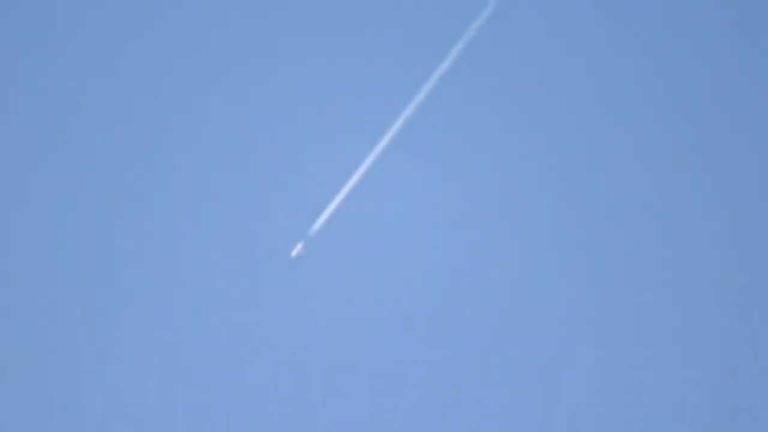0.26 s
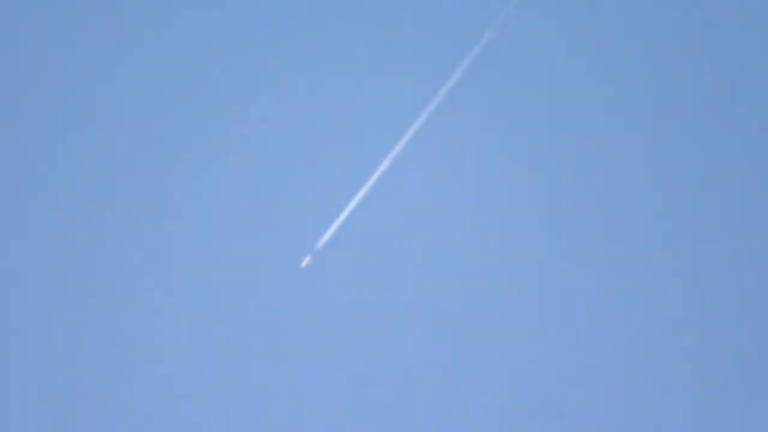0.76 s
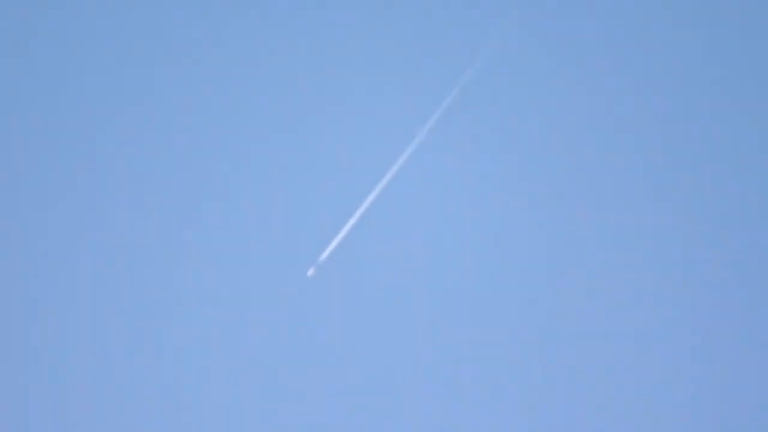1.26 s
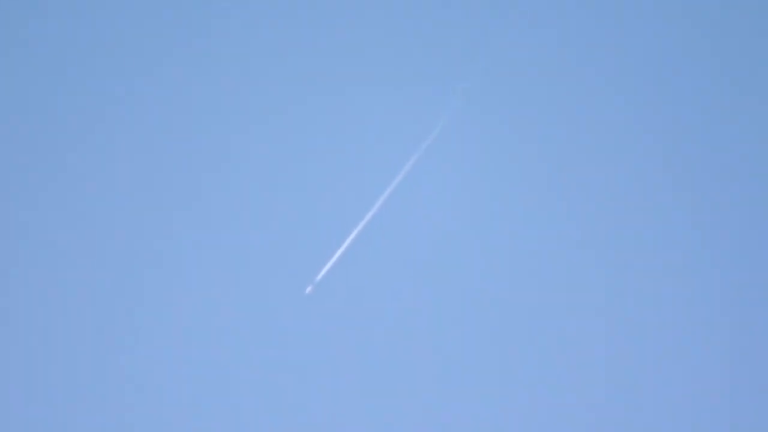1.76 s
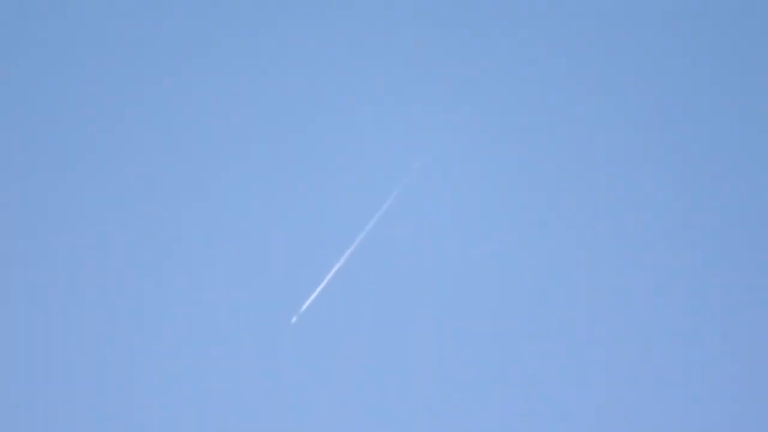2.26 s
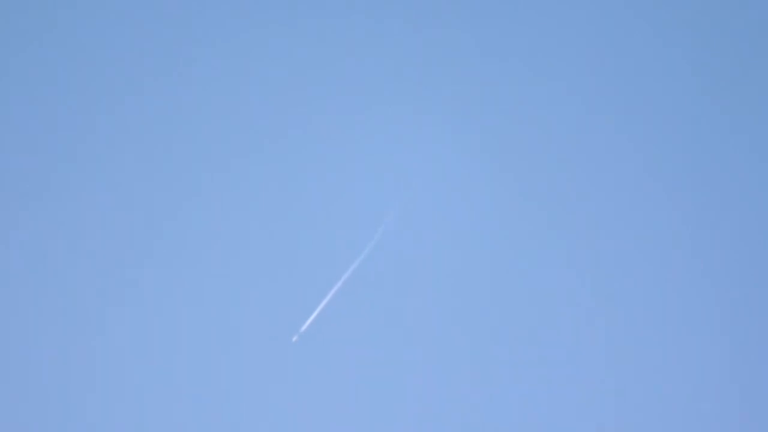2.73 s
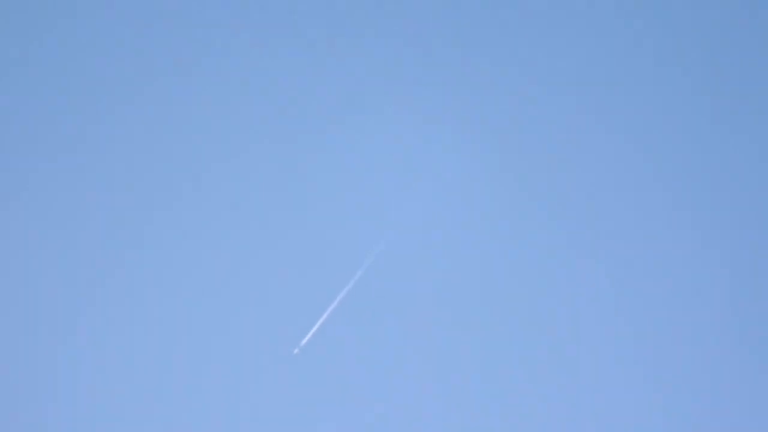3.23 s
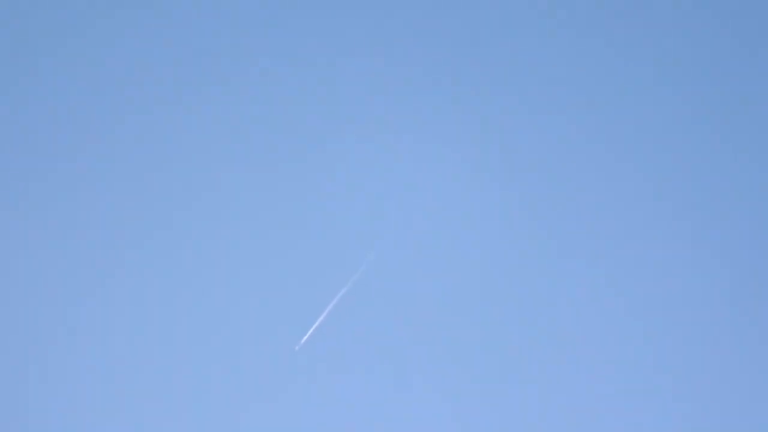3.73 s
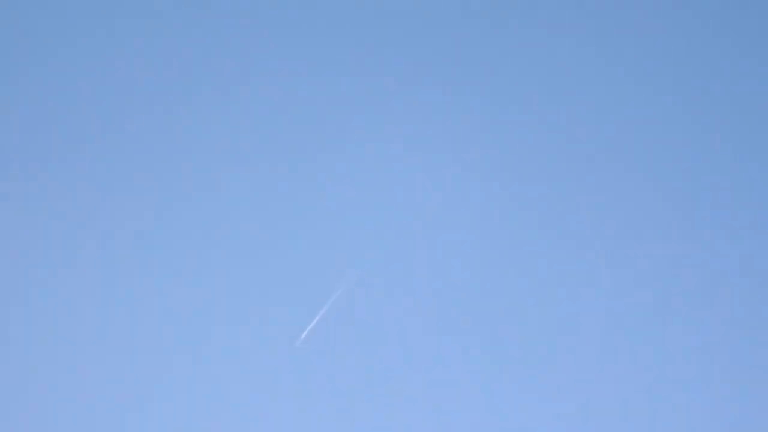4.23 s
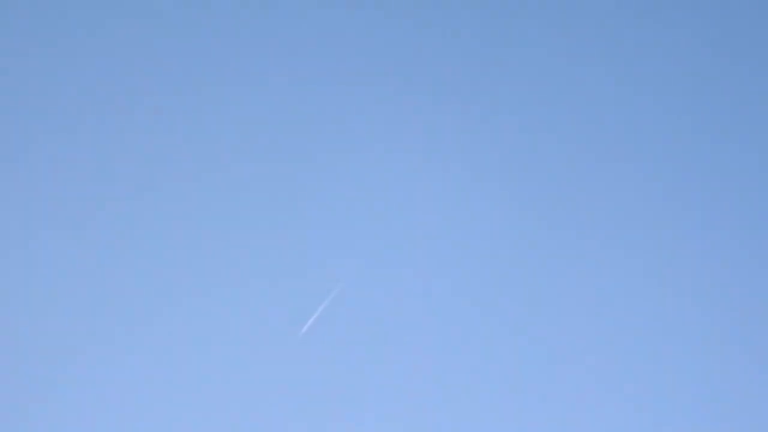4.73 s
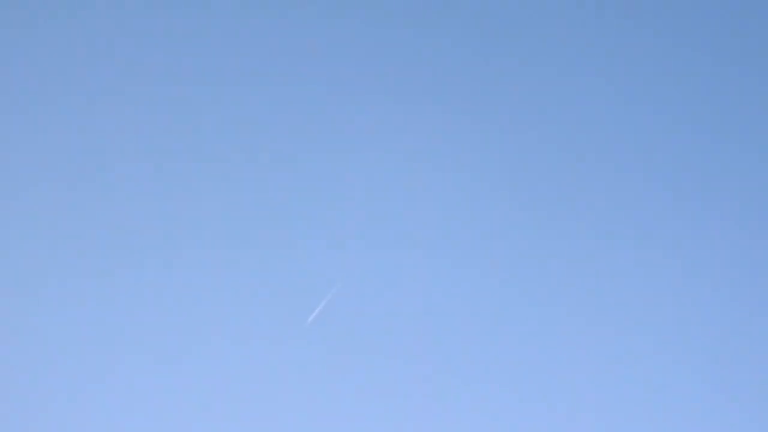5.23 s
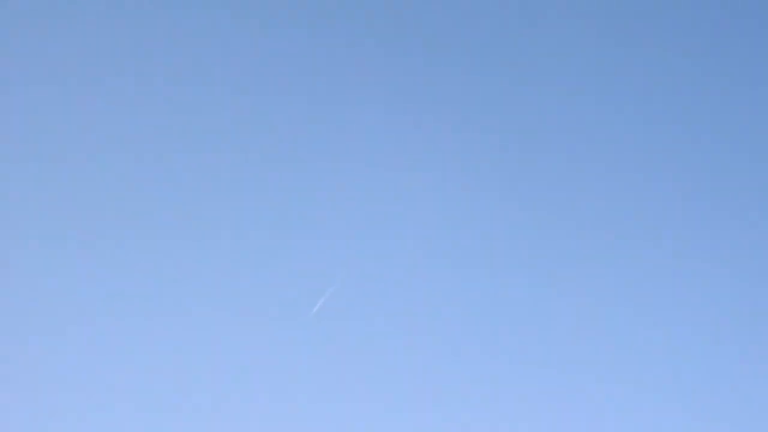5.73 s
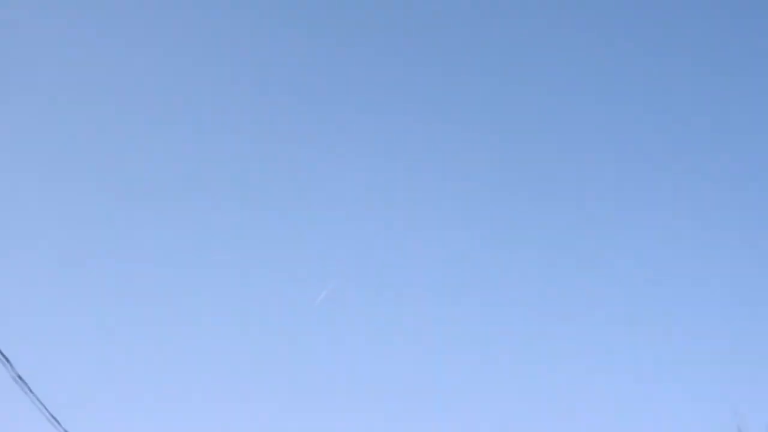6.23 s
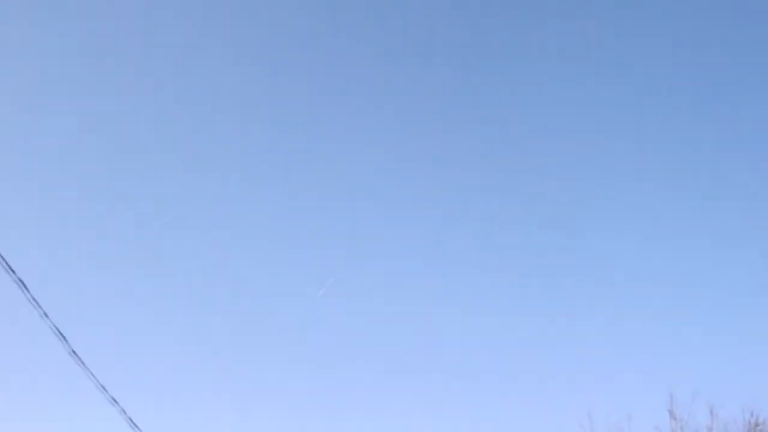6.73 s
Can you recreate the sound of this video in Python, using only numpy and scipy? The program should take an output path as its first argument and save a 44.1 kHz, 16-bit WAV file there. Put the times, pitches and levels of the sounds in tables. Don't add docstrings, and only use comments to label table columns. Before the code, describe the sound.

A very close, continuous gritty buzz from a small lens motor rings a plastic case, fluttering slightly in speed and never smooth. It begins fuller, drops a few decibels near three seconds while small metallic ticks chatter irregularly, then gradually strengthens. Soft wind, far traffic rumble and electronic hiss stay behind. A cluster of loud dry creaks at the end marks the fingers moving as the motor stops.

```python
import sys
import numpy as np
from scipy import signal
from scipy.fft import rfft, irfft, next_fast_len
from scipy.io import wavfile
from scipy.ndimage import uniform_filter1d

SR = 44100
rng = np.random.default_rng(int(sys.argv[2]) if len(sys.argv) > 2 else 0)


def ratio_of_db(decibels):
    return 10 ** (np.asarray(decibels, float) / 20)


def wrap_up_sound(samples):
    columns = np.atleast_2d(samples).T
    tamed = np.clip(columns, -1, 1)
    steps = np.round(tamed * 32767).astype(np.int16)
    wavfile.write(sys.argv[1], SR, steps)


N = 307641

MOTOR = [(0, 188, -41), (.5, 192, -42.5), (1.3, 190, -42.5), (1.6, 194, -42.5), (1.85, 190, -41.5),
         (2.201, 188, -41), (2.6, 191, -42), (2.95, 189, -46), (3.499, 187, -46.5), (3.85, 190, -46.5),
         (4.15, 185, -46.5), (4.45, 189, -45.5), (4.7, 195, -45.5), (5.1, 197, -44.5), (5.351, 190, -44.5),
         (5.799, 193, -43.5), (6.5, 191, -43.5), (6.903, 184, -42.5)]


def level(x, db):
    return x * ratio_of_db(db) / np.sqrt(np.mean(x ** 2))


def band(x, hz, width):
    return signal.lfilter(*signal.iirpeak(hz, hz / max(width, 10.), fs=SR), x)


def ring(x, modes):
    return level(sum(np.sign(side) * ratio_of_db(db) * band(x, hz, width) for hz, width, db, side in modes), 0)


def coloured(points):
    hz, db = np.transpose(points)
    size = next_fast_len(N)
    freq = np.arange(size // 2 + 1) * SR / size
    gain = ratio_of_db(np.interp(np.log(np.maximum(freq, .1)), np.log(hz), db))
    return irfft(rfft(rng.standard_normal(size)) * gain, size)[:N]


def walk(rate):
    k = int(SR / rate)
    steps = np.repeat(rng.standard_normal(N // k + 1), k)
    w = uniform_filter1d(uniform_filter1d(steps, k), k)[:N]
    return w / w.std()


def add(out, s, sound):
    i = int(s * SR)
    out[i:i + len(sound)] += sound[:len(out) - i]


def scraping(knocks, ms):
    return signal.lfilter([1], [1, -np.exp(-1000 / ms / SR)], np.abs(knocks)) * rng.standard_normal(N)


def motor_jolts(t):
    when, hz, _ = np.transpose(MOTOR)
    hunt_jolts, hunt_keep = 11.5, .82
    depth = np.maximum(.078 - .0065 * (hz - 190), .02)
    speed = np.interp(t, when, hz) * (1 + .17 * np.interp(t, when, depth) * walk(5))
    turns = np.cumsum(speed) / SR
    jolt = np.arange(int(np.interp(when[-1], t, turns)))
    chance = rng.standard_normal((2000, 3))[jolt].T

    spring = [1, -2 * hunt_keep * np.cos(2 * np.pi / hunt_jolts), hunt_keep ** 2]
    hunt = signal.lfilter([1, -.7], spring, chance[0])
    slip = .9 * hunt / hunt.std() * np.interp(np.interp(jolt, turns, t), when, depth)
    lag = signal.lfilter([1], [1, -.9], slip) + .016 * chance[2]
    at = (np.interp(jolt + lag, turns, t) * SR).astype(int)

    sign = (-1.) ** jolt
    turn_db = 1.0 * np.cos(np.pi * jolt / 3) + 1.3 * sign + 17 * slip
    touch_db = 1.0 * chance[1] - .3 * chance[1] ** 2
    coil_db = .9 * np.cos(2 * np.pi * jolt / 3) + .5 * np.cos(np.pi * jolt / 3) - .9 * sign
    knocks, to_metal, to_shell = np.zeros((3, N))
    knocks[at] = sign * ratio_of_db(turn_db + touch_db)
    to_metal[at] = ratio_of_db(2.0 * sign) * knocks[at]
    to_shell[at] = ratio_of_db(coil_db) * knocks[at]
    return knocks, to_metal, to_shell


def gears():
    # f/Hz, width/Hz, level/dB, polarity (like neighbours leave a dark notch between)
    barrel_modes = [(759, 140, -12.4, -1), (938, 81, -2, 1), (1018, 400, -10.9, -1), (1157, 105, -1, -1),
                    (1310, 153, -2.6, 1), (1423, 86, -2.3, 1), (1652, 53, -9.3, -1), (1691, 42, -7.8, -1)]
    shell_modes = [(1873, 216, -7, -1), (2036, 110, -12.4, -1), (2428, 100, -.3, 1), (2678, 118, -5.3, 1),
                   (2856, 116, -7.2, 1), (3017, 71, -16.2, 1), (3194, 193, -11.4, -1),
                   (3434, 328, -14.5, -1)]
    bracket_modes = [(4020, 260, 11, 1), (4446, 310, 10.5, -1), (5330, 360, 0, -1), (6180, 800, -6, 1)]
    can_modes = [(7480, 350, 0, 1)]

    t = np.arange(N) / SR
    when, _, load_db = np.transpose(MOTOR)
    barrel_db = np.interp(t, when, load_db)
    extra_db = barrel_db + 44.5
    shell_db = -44 + 0.75 * extra_db
    bracket_db = -57 + 0.21 * extra_db
    can_peak_s = 1.6
    can_db = -63.5 - np.maximum(1.7 * (can_peak_s - t), 2 * (t - can_peak_s))

    knocks, to_metal, to_shell = motor_jolts(t)
    no_middle = signal.butter(2, [1050, 2650], "bandstop", fs=SR, output="sos")
    scrape = signal.sosfilt(no_middle, level(scraping(knocks, ms=1.5), 0))
    push = level(knocks, 0) + ratio_of_db(-8) * scrape + level(scraping(knocks, ms=10), -12)
    fine = level(to_metal, -1.5) + level(scraping(to_metal, ms=3.4), 0)
    fine = fine + level(scraping(to_metal, ms=4.9), -0.5)
    shell_push = level(to_shell, 0) + ratio_of_db(-8) * scrape + level(scraping(to_shell, ms=14), -8.5)
    shell = ring(shell_push, shell_modes)

    rest, full = -0.53, 0.38
    slide = rest + (full - rest) * np.exp(-((t - 3.2) / 1.73) ** 2)
    shell = shell + slide * (band(shell, 3070, 360) - 0.92 * band(shell, 2860, 130))

    case = ratio_of_db(barrel_db) * ring(push, barrel_modes) + ratio_of_db(shell_db) * shell
    return case + ratio_of_db(bracket_db) * ring(fine, bracket_modes) + ratio_of_db(can_db) * ring(fine, can_modes)


def outdoors():
    # f/Hz, level/dB
    wind_colour = [(1.8, -32), (3.0, 5.5), (22, 2.5), (67, -13.5), (100, -27), (130, -75), (220, -120)]
    town_colour = [(40, -2.5), (70, 2.5), (95, -3.5), (150, -2), (200, 0.5), (270, -4.5), (310, -12),
                   (520, -19), (1000, -23), (3000, -17), (4200, -31.5), (5000, -30.5), (9000, -72)]
    # t/s, level/dB
    breeze = [
        (0, -36),
        (1.6, -35),
        (3.0, -36),
        (4.5, -39.5),
        (5.6, -39.5),
        (6.3, -37),
        (6.98, -39.5),
    ]
    s, db = np.transpose(breeze)
    gust_db, gusts_per_s = 3, 3.42
    wind = level(coloured(wind_colour), 0)
    wind = wind * ratio_of_db(np.interp(np.arange(N) / SR, s, db) + gust_db * walk(gusts_per_s))
    return wind + level(coloured(town_colour), -43) * ratio_of_db(0.6 * walk(2.3))


def electronics():
    # f/Hz, level/dB
    hiss_colour = [(200, 15.5), (6000, -7), (9000, -5), (12500, -4), (16000, -8.5)]
    # f/Hz, level/dB
    whistle_tones = [(15547, -92), (15606, -100)]
    frame_hz = 29.503
    burst_start, burst_share, blip_at = .12, .065, .565

    t = np.arange(N) / SR
    frame = t * frame_hz % 1
    same = rng.standard_normal(1500)[(frame * SR / frame_hz).astype(int)]
    in_burst = np.abs(frame - burst_start - burst_share / 2) < burst_share / 2
    crackle = in_burst * (0.41 * same + rng.standard_normal(N))
    blip = (np.abs(frame - blip_at) < .008) * same
    buzz = level(band(crackle, 13000, 9000), -70.0) + level(band(blip, 7600, 2000), -88)
    whistle = sum(ratio_of_db(db) * np.sin(2 * np.pi * hz * t) for hz, db in whistle_tones)
    return level(coloured(hiss_colour), -55.5) + buzz + whistle


def focus_drive():
    # f/Hz, width/Hz, level/dB
    spots = [(950, 260, -62), (4150, 300, -60.5)]
    out = np.zeros(N)
    for hz, width, db in spots:
        hum = band(band(rng.standard_normal(N), hz, width), hz, 1.6 * width)
        out += level(hum, db)
    return out


def rattles():
    # t/s, level/dB (the peak lies 8 dB lower)
    hard = [(0.168, -48), (2.0178, -42), (2.8796, -33), (2.9148, -38), (3.0081, -39.5), (3.0727, -41),
            (3.293, -39), (3.3235, -42), (3.4211, -36), (3.6396, -34), (3.6755, -29.5), (3.7673, -34),
            (3.798, -31), (3.8197, -35), (3.8609, -33), (4.0118, -40), (4.138, -39), (4.4727, -39),
            (4.5645, -37), (4.6249, -40), (4.6563, -36), (4.8155, -44), (4.9018, -41), (5.0876, -35),
            (5.2415, -33), (5.3732, -39), (5.4295, -41), (5.627, -43), (6.7186, -41), (6.8184, -33.5)]
    turn_s, loose_at_s = .0315, 2.82
    tight_db, loose_db, spread_db = -53, -46, 3.2

    out, t = np.zeros(N), np.arange(600) / SR
    chance = rng.standard_normal((260, 603))
    soft_s = np.arange(.04, MOTOR[-1][0], turn_s)
    soft_chance = chance[30:30 + len(soft_s)]
    soft_s = soft_s + 0.0046 * soft_chance[:, 0]
    soft_db = np.where(soft_s < loose_at_s, tight_db, loose_db) + spread_db * soft_chance[:, 1]
    for (s, db), row in zip(hard + list(zip(soft_s, soft_db)), chance):
        hz = 5420 + 100 * row[2]
        chatter = row[3:] * np.exp(-(t / 0.0034) ** 2)
        chatter = band(band(chatter, hz, 360), hz, 760)
        add(out, s, ratio_of_db(db - 8.0) * chatter / np.abs(chatter).max())
    return out


def fingers():
    # t/s, peak level/dB, low ring f/Hz, high ring f/Hz, length/ms
    creaks = [(3.2158, -29.5, 800, 962, 4.9), (6.573, -25, 900, 1135, 3.7), (6.596, -18.5, 974, 2230, 6.2),
              (6.601, -22.5, 950, 2120, 6.2), (6.608, -30, 1010, 2600, 8.7), (6.616, -25, 1100, 1500, 8),
              (6.625, -29.5, 1280, 2380, 7.9), (6.632, -32, 800, 1700, 6.6), (6.64, -34, 1010, 1420, 5),
              (6.7185, -19.5, 1480, 2880, 4.2), (6.757, -32, 1400, 3600, 4.5), (6.783, -28, 795, 1400, 3.3),
              (6.823, -29, 2200, 2700, 2.7), (6.9735, -25.5, 1360, 1600, 1.7)]
    # t/s, peak level/dB
    ticks = [
        (2.0178, -41),
        (6.7181, -48),
        (6.765, -46),
    ]
    out, t = np.zeros(N), np.arange(1200) / SR
    for s, db, low_hz, high_hz, ms in creaks:
        slip = rng.standard_normal(1200) * np.clip(t / 0.00021, 0, 1) * np.exp(-(t / ms * 1000) ** 4)
        low, high = slip, slip
        for share in (.6, .8, .95):
            low = band(low, low_hz, share * low_hz)
        for share in (.4, .6, .8):
            high = band(high, high_hz, share * high_hz)
        creak = level(low, 0) + level(high, 0.2)
        add(out, s, ratio_of_db(db) * creak / np.abs(creak).max())
    for s, db in ticks:
        tick = band(rng.standard_normal(1200) * np.exp(-t / 0.0021), 7000, 5000)
        add(out, s, ratio_of_db(db) * tick / np.abs(tick).max())
    return out


def scene():
    return (gears() + rattles() + fingers() + outdoors() + electronics() + focus_drive())[None]


def top_cut(x):
    return signal.sosfilt(signal.butter(12, 15810, fs=SR, output="sos"), x)


def record(dry):
    low_pass = signal.ellip(10, .2, 60, 15750, fs=SR, output="sos")
    mix = signal.sosfilt(low_pass, dry)
    return top_cut(mix)


dry = scene()
out = record(dry)
wrap_up_sound(out)
```